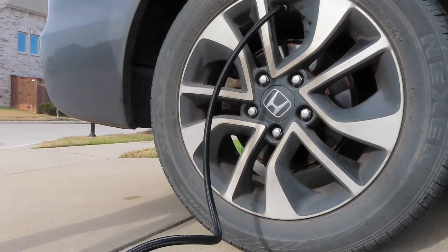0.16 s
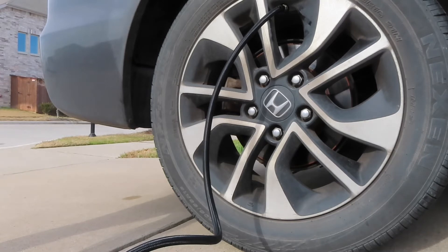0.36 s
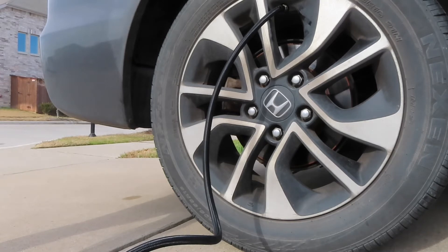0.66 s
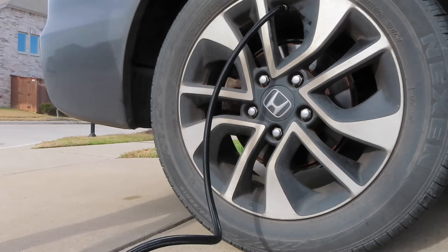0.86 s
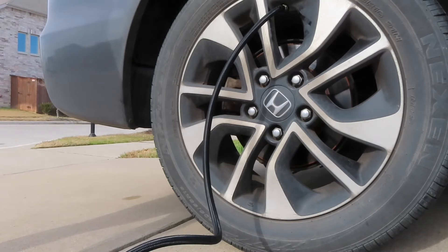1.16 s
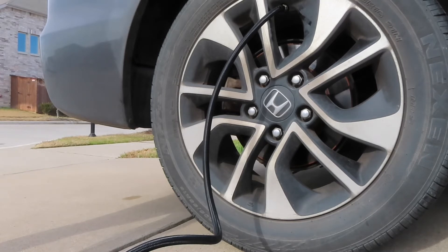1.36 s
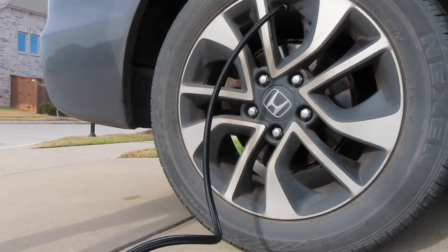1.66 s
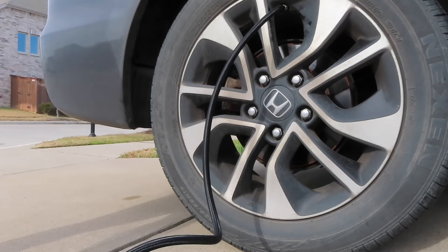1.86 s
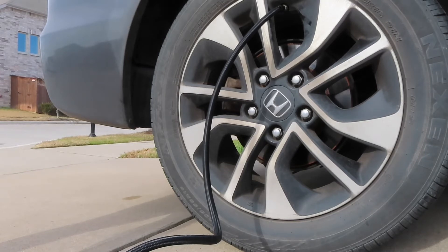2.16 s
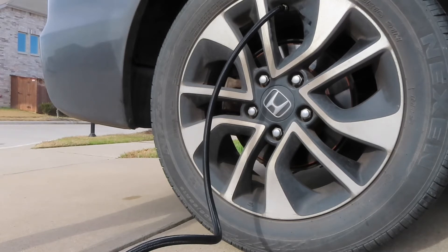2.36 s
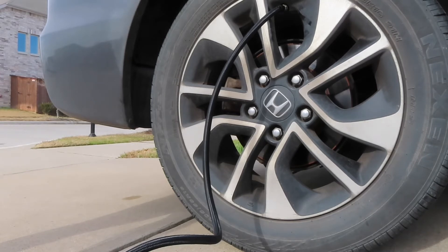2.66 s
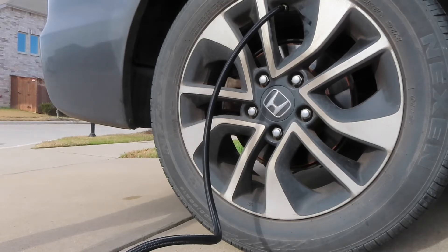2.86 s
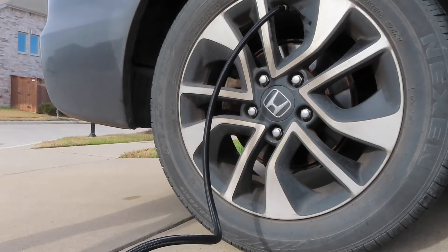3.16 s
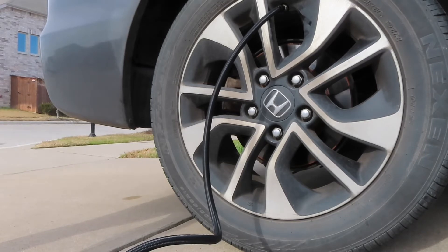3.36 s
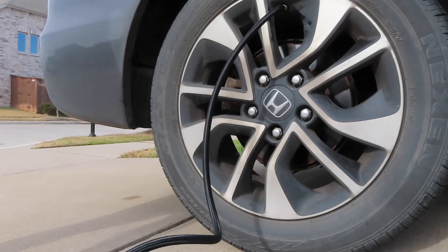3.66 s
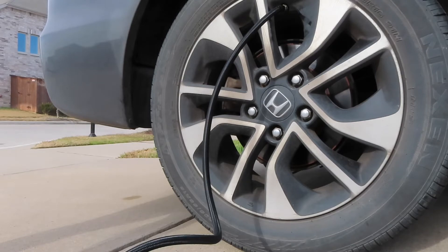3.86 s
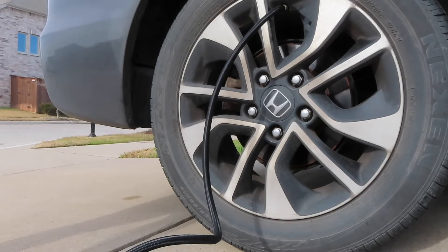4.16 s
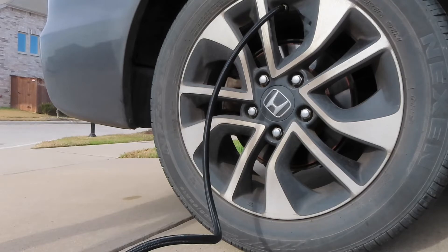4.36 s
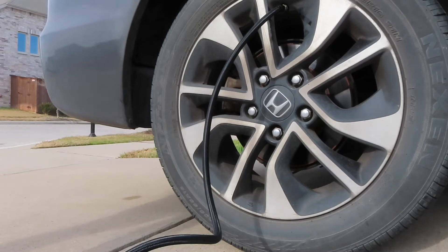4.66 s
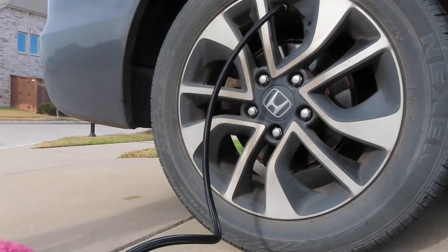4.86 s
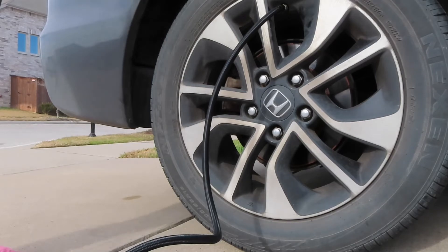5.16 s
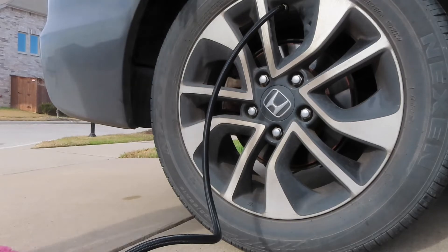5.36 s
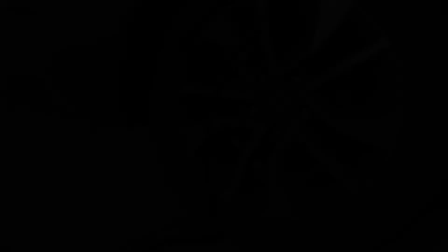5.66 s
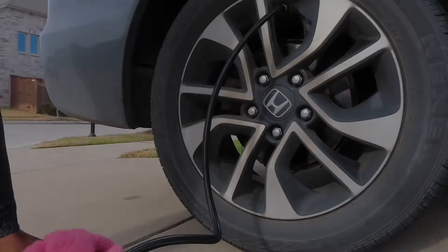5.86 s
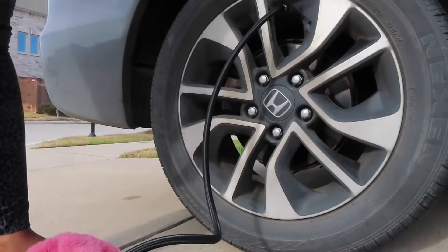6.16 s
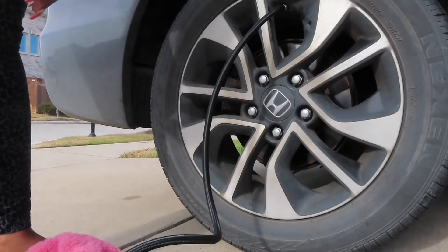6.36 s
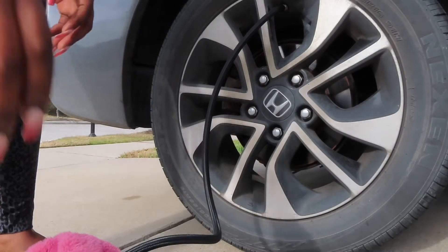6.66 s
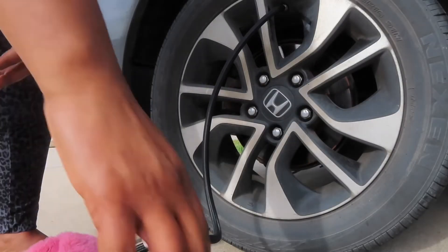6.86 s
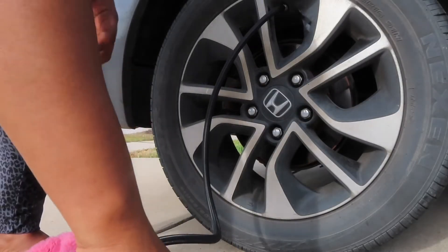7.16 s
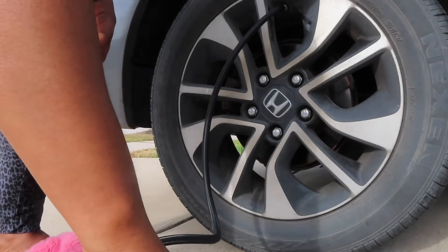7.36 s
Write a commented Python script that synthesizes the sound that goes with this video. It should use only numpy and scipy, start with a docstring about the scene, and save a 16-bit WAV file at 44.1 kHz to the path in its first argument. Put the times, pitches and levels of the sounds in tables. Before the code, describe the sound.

A steady, subdued, fast motor buzz plays first, nearly unchanging, with a few barely noticeable dull bumps near five seconds. Then a hard cut brings a much louder, deeper piston pump, buzzing, clattering and hissing close to the microphone, with an idling car engine low underneath. Its pitch drops suddenly a second later and creeps back up, with small sharp ticks. Open driveway, no obvious echo.

```python
"""A portable piston compressor inflates a car tyre on a driveway while the car idles.
Each stroke throbs as blows ring the case, knocks on loose panels, rattles, and lets noisy air hiss
through the valves. The idling engine is a low drone of a few sine waves.
It runs quietly at double speed first, as a time lapse, then cuts to real time at full level, where
the motor sags and slowly picks up again. A few dull bumps and sharp ticks are added."""
import sys
import numpy as np
from scipy import signal
from scipy.fft import rfft, irfft, next_fast_len
from scipy.io import wavfile
from scipy.ndimage import uniform_filter1d, map_coordinates

SR = 44100
rng = np.random.default_rng(int(sys.argv[2]) if len(sys.argv) > 2 else 0)


def put_to_file(sound):
    """Save the sound as 16-bit audio at rate SR, in the file named by the first command-line argument."""
    columns = np.atleast_2d(sound).T  # one column per channel
    safe = np.clip(columns, -1, 1)
    whole_steps = np.round(safe * 32767)
    wavfile.write(sys.argv[1], SR, whole_steps.astype(np.int16))


N = 330743

# Motor speed in the time lapse: it picks up, then holds.
# Each row: time in seconds, strokes per second as heard at double speed.
LAPSE_MOTOR = [(0.0, 99.35), (0.18, 99.35), (0.38, 106.65), (0.6, 106.69), (1.3, 106.37), (2.0, 107.05),
               (3.8, 106.73), (5.64, 106.81)]
# Motor speed in real time: it sags and slowly recovers.
# Each row: time in seconds, strokes per second.
LIVE_MOTOR = [(5.7, 53.38), (6.72, 53.51), (6.87, 49.54), (7.05, 49.87), (7.26, 50.17), (7.47, 51.62)]
# Blows of piston and valves within one stroke, at real-time speed.
# Each row: place as a share of the turn, relative force (minus pulls), contact time in milliseconds,
# relative level of the knock on the loose panels in dB.
BLOWS = [(0, 0.94, 1.11, 1), (.028, 0.46, 1.8, -18), (0.245, 0.58, 1.47, -6), (.377, 1.24, 2.5, -5),
         (0.524, -0.21, 1.44, -35), (0.583, -0.31, 2.66, -14), (.652, 0.26, 0.6, -8)]
# Resonances of the case, rung by every blow.
# Each row: frequency in Hz, width in Hz, level in dB.
CASE_MODES = [(81, 21.5, -25.5), (111.5, 40, -26), (209, 64.6, -26.5), (295, 60.5, -33), (372.2, 20, -25.5),
              (453.4, 71, -22.5), (544.5, 46, -28), (630, 23, -40.5), (914, 43.4, -27), (1253, 98, -37.5),
              (1717, 248, -28.5), (2094, 33, -28.5), (2482, 43, -28.5), (3380, 620, -31.5)]
# Resonances of the loose panels. Each row: frequency in Hz, width in Hz, relative level in dB.
PANEL_MODES = [(1370, 100, -14), (1606, 91, 10.5), (1860, 37, -2.5), (1854, 22, 7), (2040, 63, 8),
               (2420, 69, -2), (2960, 110, 6.5)]
# Tone colour of the loose rattle. Each row: frequency in Hz, relative level in dB.
RATTLE_COLOUR = [(20, -9), (60, 2), (130, 1.5), (250, -3), (420, 2.5), (750, 1), (1150, -6), (1450, -2),
                 (1800, 2), (2300, -2), (2750, -3.5), (3050, -10), (3500, -12.5), (4100, -27), (6000, -65)]
# Tone colour of the air in the valves. Each row: frequency in Hz, relative level in dB.
AIR_COLOUR = [(2500, -4), (4000, 0.5), (5000, 1.5), (6500, -3), (8500, 0.5), (10200, 0), (13300, 6),
              (13900, 6), (14300, -29.5), (16000, -40)]
# Whistling resonances of the air. Each row: frequency in Hz, width in Hz, level above the hiss in dB.
AIR_MODES = [(5680, 99, 7), (7220, 100, 5), (8527, 74, 6), (9100, 200, 11), (12070, 130, 9.5),
             (13150, 200, -3)]
# The engine's drone. Each row: multiple of the firing rate, relative level in dB.
ENGINE_ORDERS = [(1, -2.5), (2, -10), (3, -6.5)]
# Soft bumps. Each row: time of the peak in seconds, level in dB, half length in seconds.
BUMPS = [(4.828, -49, .03), (4.887, -52, .03), (5.09, -52, .022)]
# Sharp ticks. Each row: start in seconds, level in dB, decay in seconds, centre frequency in Hz.
TICKS = [(6.369, -35, .002, 7000), (7.152, -30, .001, 2400), (7.478, -24, 0.0048, 3560)]

CUT_S, LAPSE_END_S = 5.676, 5.666  # real time fades in, time lapse starts to fade out
LAPSE_SPEED = 2  # times real time
FAST_HZ, SLOW_HZ = 53.3, 50.0  # real-time strokes per second, at full speed and fully sagged
LAPSE_STROKE_S, LIVE_STROKE_S = 1.00395, 5.8069  # a moment when the piston strikes, in each part
INERTIA_S = 0.06  # the rotor's inertia rounds every change of speed
SAG_THROB_DB, SAG_CLATTER_DB = -1, -0.5  # change of level when fully sagged
# The gear whine swells once as the motor picks up: moment, half length and height
GEAR_TEETH = 37
WHINE_S, WHINE_LENGTH_S, WHINE_DB = 7.29, 0.078, 5.5
# Engine firing rate in real time, and a surge that comes as the pump picks up and then settles
IDLE_HZ = 27.92
SURGE_S, SURGE_HZ, SURGE_RISE_S, SURGE_SETTLE_S = 0.16, 1.25, 0.36, 1.97
LEAN_DB = 0.1  # above the bass, left is raised and right lowered by this much
TOP_HZ = 15700  # the treble ends here

T = np.arange(N) / SR
SIZE = next_fast_len(N + 8192)  # room for ringing past the end
FREQ = np.maximum(np.arange(SIZE // 2 + 1) * SR / SIZE, 1)


def undb(db):
    """Turn decibels into gain."""
    return 10 ** (np.asarray(db) / 20)


def unit(x):
    """Scale to an rms (average strength) of 1."""
    return x / np.sqrt(np.mean(x ** 2))


def curves(table):
    """Draw each column of a time table as a curve, sample by sample."""
    seconds, *columns = np.transpose(table)
    return [np.interp(T, seconds, column) for column in columns]


def shape(points, hz):
    """Gain at each frequency, drawn through a table of Hz and dB."""
    point_hz, db = np.transpose(points)
    return undb(np.interp(np.log(hz), np.log(point_hz), db))


def ring(modes, hz):
    """Response of a set of damped resonances; a wider one dies away sooner."""
    return sum(undb(db) / (1 + 1j * (hz / f - f / hz) * f / width) for f, width, db in modes)


def filtered(x, response):
    """Pass a signal through a frequency response."""
    return irfft(rfft(x, SIZE) * response, SIZE)[:N]


def noise():
    """White noise."""
    return rng.standard_normal(N)


def walk(rate):
    """Wander by chance with a spread near 1, taking `rate` new values a second."""
    return 1.2 * np.interp(T * rate, np.arange(4096), rng.standard_normal(4096))


def gate(turn, at, decay):
    """A burst that opens at one point of every turn and dies away; both are shares of a turn."""
    return np.exp(-((turn - at) % 1) / decay)


def throb(turn, stroke_hz, dull_hz, top_hz=2950, smear=0.42, flutter_db=0.21, chatter_db=-0.15):
    """Blows ring the case; their harmonics slide through its resonances as the speed changes."""
    order = np.arange(1, 65)
    speeds = np.linspace(48, 55, num=29)
    crank = np.linspace(0, 1, num=2049)
    hz = np.outer(speeds, order)
    # a longer contact makes a softer blow
    push = sum(force * np.exp(-2j * np.pi * order * at) / (1 + 1j * hz * ms / 1000)
               for at, force, ms, _ in BLOWS)
    dulling = np.sqrt((1 + (hz / dull_hz) ** 2) * (1 + (hz / top_hz) ** 20))
    harmonics = push * ring(CASE_MODES, hz) / dulling
    # the walls pass the treble slightly out of step with the bass, which rounds each blow
    harmonics = harmonics * np.exp(-1j * smear * (hz / 1000) ** 2)

    # one waveform of the turn per speed, read at the present speed and crank position
    cycles = np.exp(2j * np.pi * np.outer(order, crank))
    speed_place = np.interp(stroke_hz, speeds, np.arange(len(speeds)))
    crank_place = turn % 1 * (len(crank) - 1)

    def play(weight):
        """Play the harmonics, each with its own weight."""
        waves = ((harmonics * weight) @ cycles).real
        return map_coordinates(waves, [speed_place, crank_place], order=1, mode="nearest")

    beat = play(0.98) * undb(flutter_db * walk(40))
    # the hard edge of each stroke varies apart from its push
    edge = play(order / order[-1]) * (undb(chatter_db * walk(90)) - 1)
    # the gear teeth mesh on one high harmonic
    swell = np.exp(-((T - WHINE_S) / WHINE_LENGTH_S) ** 2)
    whine = play(order == GEAR_TEETH) * (undb(WHINE_DB * swell) - 1)
    return beat + edge + whine


def knocks(turn, hz, slop=0.005):
    """Each blow shakes the loose panels, by chance in force, direction and moment."""
    strokes = np.arange(np.ceil(turn[0]) + 1, turn[-1] - 1)
    pulses = np.zeros(N)
    for at, _, _, db in BLOWS:
        shift, direction, strength = rng.standard_normal((len(strokes), 3)).T
        place = np.interp(strokes + at + slop * shift, turn, np.arange(N))
        np.add.at(pulses, place.astype(int), np.sign(direction) * undb(db + 1.3 * strength))
    # the small panels radiate little bass, and their soft contacts little treble
    band = 1 / np.sqrt((1 + (1080 / hz) ** 20) * (1 + (hz / 3200) ** 20))
    return unit(filtered(pulses, ring(PANEL_MODES, hz) * band))


def rattle(turn, hz, steady=1.0, decay=1.0, side_db=-21, spread_hz=350):
    """Loose parts chatter after the main blow, over the steady rush of the motor."""
    shake = (steady + gate(turn, 0, decay)) * undb(0.95 * walk(130))
    colour = shape(RATTLE_COLOUR, hz)
    middle, side = (unit(filtered(noise() * shake, colour)) for _ in range(2))
    # above the bass a little spreads sideways
    side = filtered(side, 1 / (1 + (spread_hz / hz) ** 4))
    return middle + undb(side_db) * side * np.array([[1], [-1]])


def air(turn, hz, steady=0.74, second=0.51, lag_s=3.2e-5, diffuse_db=-3):
    """Air hisses in two spurts a stroke, first on the left, with reflections from all round."""
    openings = steady + gate(turn, 0.13, 0.25) + second * gate(turn, 0.34, 0.15)
    spurts = openings * undb(0.9 * walk(70))
    whistles = sum(abs(ring([mode], hz)) ** 2 for mode in AIR_MODES)
    colour = shape(AIR_COLOUR, hz) * np.sqrt(1 + whistles)
    jet = unit(noise() * spurts)
    # the lag is in real-time seconds; double speed halves it
    direct = np.array([filtered(jet, colour * np.exp(-2j * np.pi * hz * lag)) for lag in (0, lag_s)])
    diffuse = np.array([filtered(unit(noise() * spurts), colour) for _ in range(2)])
    return direct + undb(diffuse_db) * diffuse


def compressor(run, speed, stroke_s, dull_hz, throb_db, knock_db, rattle_db, air_db):
    """The whole pump, softer when it sags; faster time raises strokes and resonances alike."""
    rate = uniform_filter1d(curves(run)[0], int(INERTIA_S * SR))
    turn = np.cumsum(rate) / SR
    turn = turn - np.interp(stroke_s, T, turn)  # a whole turn falls on the known stroke
    sag = np.clip((FAST_HZ - rate / speed) / (FAST_HZ - SLOW_HZ), 0, 1)
    hz = FREQ / speed  # the frequency each sound would have in real time
    clatter = undb(knock_db) * knocks(turn, hz)
    clatter = clatter + undb(rattle_db) * rattle(turn, hz)
    clatter = clatter + undb(air_db) * air(turn, hz)
    beat = throb(turn, rate / speed, dull_hz)
    return undb(throb_db + SAG_THROB_DB * sag) * beat + undb(SAG_CLATTER_DB * sag) * clatter


def idle_rate():
    """The engine's firing rate climbs briefly and sinks back to idle."""
    since = T - SURGE_S
    rise = np.clip(since / SURGE_RISE_S, 0, 1)
    settle = np.exp(-np.maximum(since - SURGE_RISE_S, 0) / SURGE_SETTLE_S)
    return IDLE_HZ + SURGE_HZ * rise * settle


def engine(firing_hz, db):
    """The low, even drone of the idling car: sine waves at multiples of the firing rate."""
    turn = np.cumsum(firing_hz * (1 + 0.0015 * walk(5.2))) / SR
    drone = sum(undb(level + 0.45 * walk(2.92)) * np.sin(2 * np.pi * multiple * turn)
                for multiple, level in ENGINE_ORDERS)
    return undb(db) * drone


def bumps():
    """A few dull bumps: low noise that swells and fades smoothly."""
    swell = sum(undb(db) * np.exp(-((T - s) / length) ** 2) for s, db, length in BUMPS)
    return swell * unit(filtered(noise(), ring([(151, 120, 0)], FREQ) ** 2))


def ticks(dull_hz=10500):
    """Short ticks and a clack over the running pump: noise that starts at once and dies away."""
    out = 0
    for s, db, decay, hz in TICKS:
        colour = ring([(hz, hz, 0)], FREQ) / (1 + (FREQ / dull_hz) ** 4)
        burst = (T > s) * np.exp(-abs(T - s) / decay)
        out = out + undb(db) * burst * unit(filtered(noise(), colour))
    return out


def scene():
    """The quiet time lapse gives way to the loud pump in real time."""
    # dull_hz, where the throb starts to dull, is a real-time frequency
    lapse = compressor(LAPSE_MOTOR, LAPSE_SPEED, LAPSE_STROKE_S, dull_hz=2830,
                       throb_db=-25.5, knock_db=-64.5, rattle_db=-55.5, air_db=-72.5)
    lapse = lapse + engine(LAPSE_SPEED * idle_rate(), db=-51.5)
    live = compressor(LIVE_MOTOR, 1, LIVE_STROKE_S, dull_hz=9000,
                      throb_db=1.06, knock_db=-35.0, rattle_db=-28, air_db=-42.0)
    live = live + engine(firing_hz=IDLE_HZ, db=-25.0)
    fade_out = np.clip((LAPSE_END_S - T) / 0.0096 + 1, 0, 1)
    fade_in = np.clip((T - CUT_S) / 0.025, 0, 1)
    return fade_out * lapse + fade_in * live + bumps() + ticks()


def record(dry, ceiling=1.0, lead=0.013, lean_hz=180):
    """Lean the sound slightly left above the bass, gently round the peaks and cut the top."""
    # left is raised and moved ahead by `lead` radians; right is lowered and held back as much
    lean = (np.log(undb(LEAN_DB)) + 1j * lead) / (1 + (lean_hz / FREQ) ** 6)
    heard = np.array([filtered(dry[0], np.exp(lean)), filtered(dry[1], np.exp(-lean))])
    rounded = ceiling * np.tanh(heard / ceiling)
    top_cut = signal.ellip(8, 0.2, 70, TOP_HZ, fs=SR, output="sos")
    return signal.sosfilt(top_cut, rounded)


dry = scene()
out = record(dry)
put_to_file(out)
```